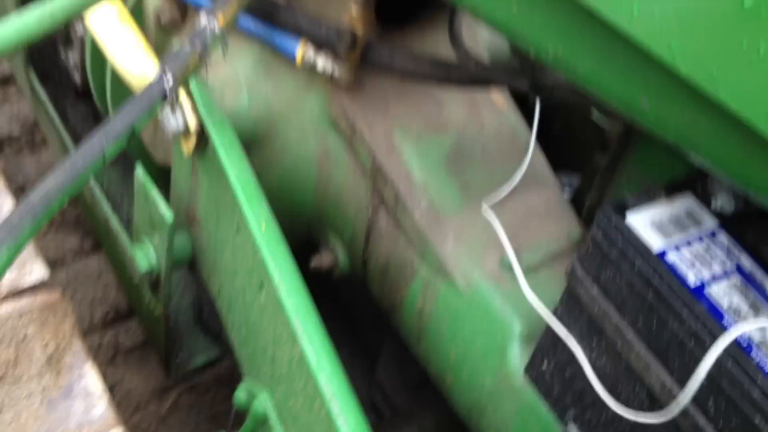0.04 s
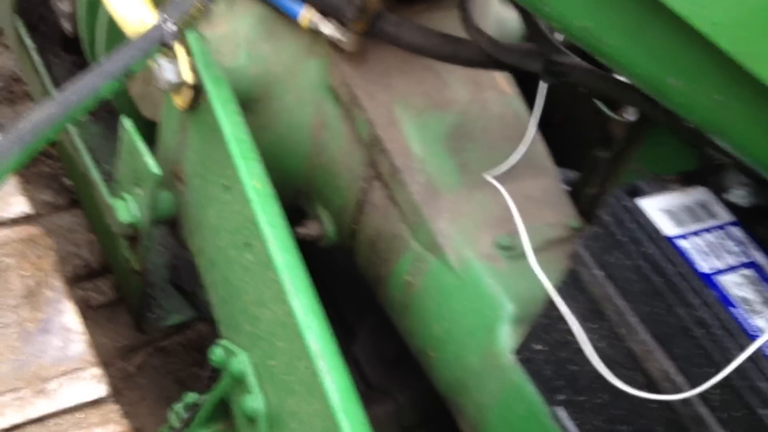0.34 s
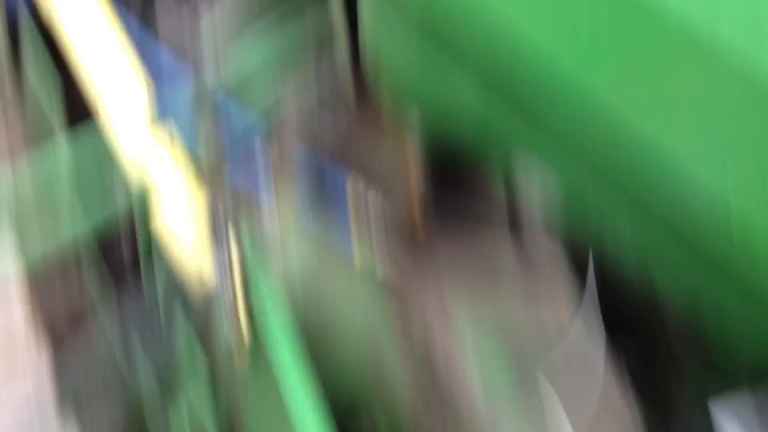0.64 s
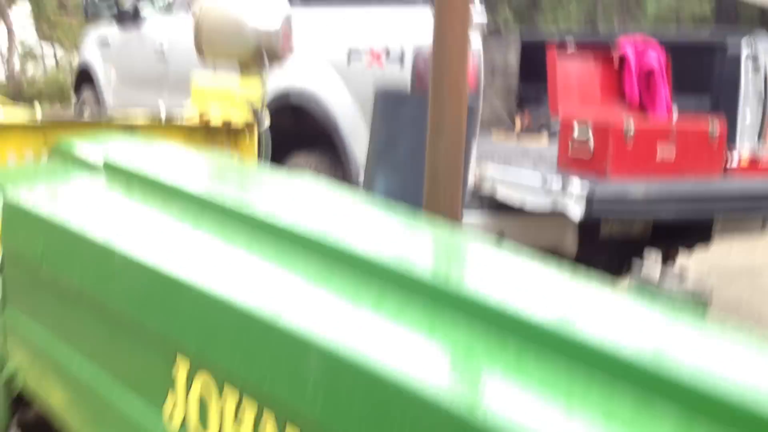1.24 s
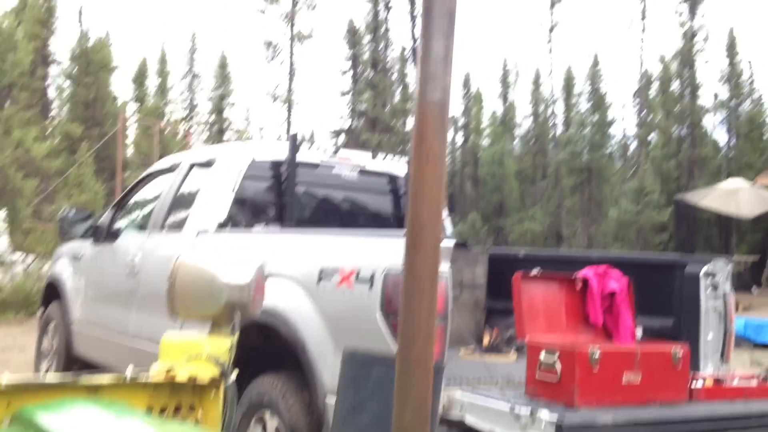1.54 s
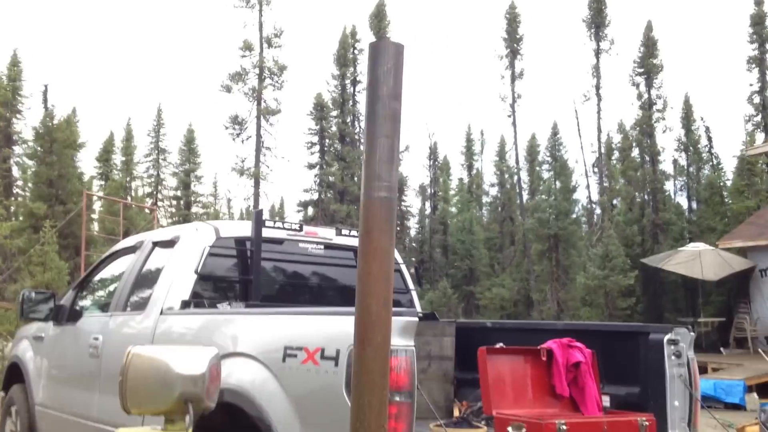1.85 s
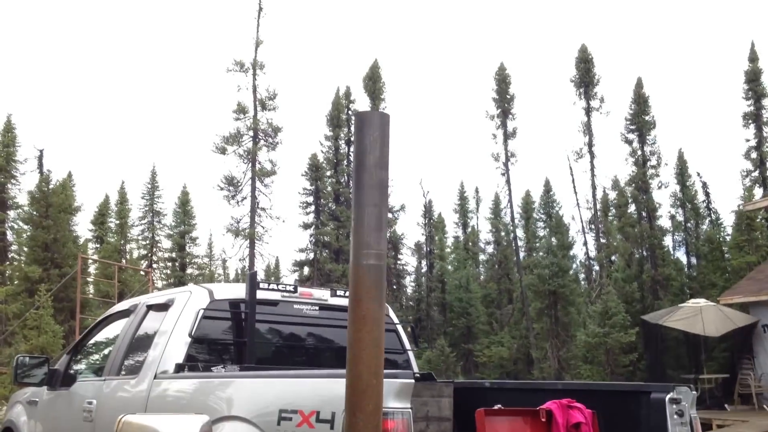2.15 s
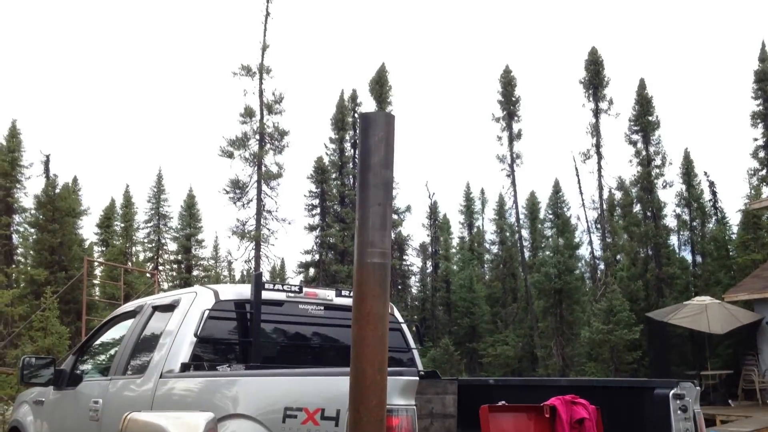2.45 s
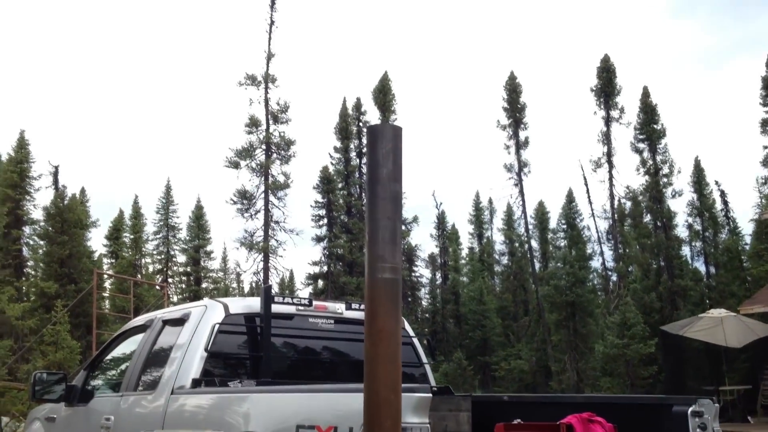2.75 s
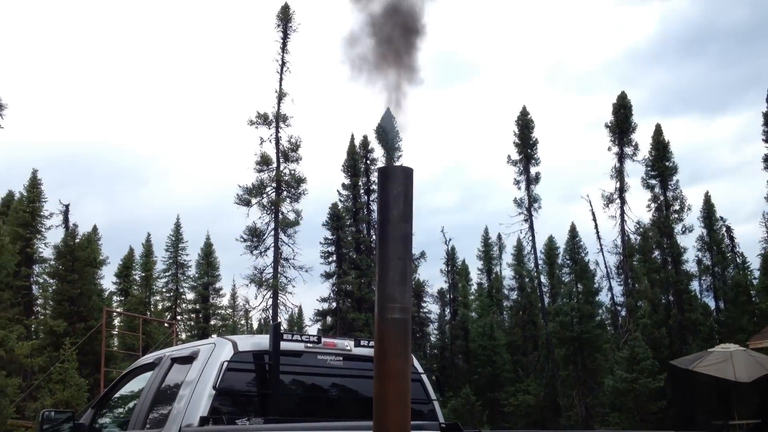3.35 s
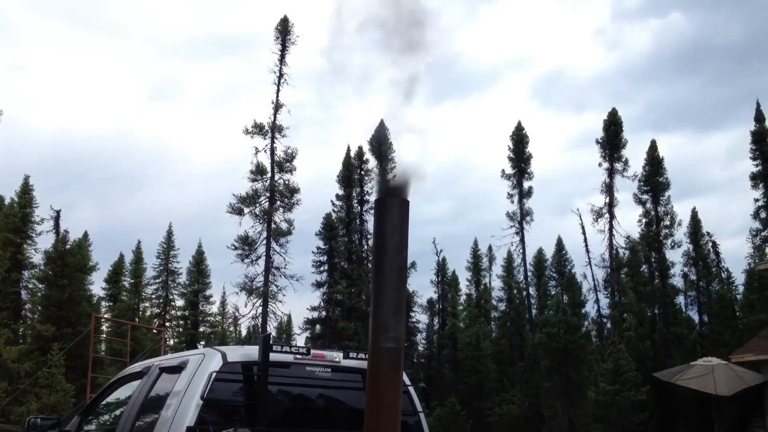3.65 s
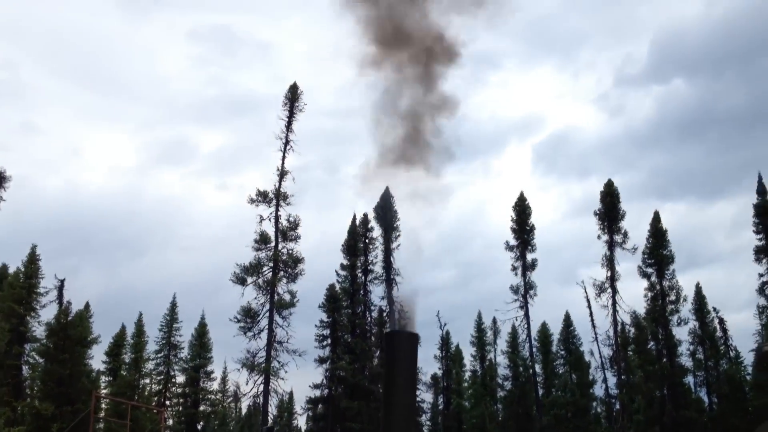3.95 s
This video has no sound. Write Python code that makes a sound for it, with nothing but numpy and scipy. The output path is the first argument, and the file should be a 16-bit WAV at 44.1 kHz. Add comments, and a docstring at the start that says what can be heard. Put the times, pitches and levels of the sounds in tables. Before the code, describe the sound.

A diesel tractor starts outdoors. After a quiet moment with dull bumps and rubbing on the hand-held microphone, the starter clanks in and whines, then the engine catches and runs with quickening knocks and clatter.

```python
"""Diesel tractor start

Outdoors, a hand-held camera is swung round with soft bumps and rubbing.
The starter pinion clanks in and whines against the ring gear.
The engine catches: combustion knocks, with brighter clacks between them, come ever faster
over gear clatter and exhaust. The yard adds a short echo."""
import sys
import numpy as np
from scipy import signal
from scipy.fft import rfft, irfft
from scipy.io import wavfile
from scipy.ndimage import uniform_filter1d

SR = 44100
rng = np.random.default_rng(int(sys.argv[2]) if len(sys.argv) > 2 else 0)


def pcm_store(signal):
    """Save signal as 16-bit PCM."""
    levels = np.round(np.clip(np.atleast_2d(signal), -1, 1) * 32767)
    wavfile.write(sys.argv[1], SR, levels.astype(np.int16).T)


N = 176400
T = np.arange(N) / SR

# combustion knocks: t/s, level/dB, length/s, strongest f/Hz
FIRINGS = [(2.829, -23, 0.019, 1470), (2.984, -21, 0.02, 1466), (3.021, -22.5, 0.005, 1810),
           (3.118, -22.5, 0.039, 2150), (3.174, -23.5, 0.012, 1860), (3.234, -17.5, 0.011, 1156),
           (3.332, -16, 0.02, 1890), (3.429, -19.5, 0.008, 1590), (3.515, -15.5, 0.0079, 1220),
           (3.598, -21.5, 0.011, 1710), (3.674, -23, 0.017, 1550), (3.751, -13, 0.0057, 1646),
           (3.819, -17.5, 0.0098, 1690), (3.886, -20, 0.0093, 1680), (3.95, -14, 0.0072, 1575)]
# mechanical clacks: t/s, body/dB, sizzle/dB
CLACK_HITS = [(2.822, -24, -27.5), (3.071, -13.5, -27), (3.194, -11.5, -24), (3.394, -15.5, -26.5),
              (3.482, -11.5, -28.5), (3.564, -20, -31.5), (3.646, -16.5, -28.5), (3.72, -10.5, -26),
              (3.794, -28, -29.5), (3.859, -17.5, -31.5), (3.925, -12, -24), (3.987, -16.5, -30)]
# running noise: t/s, exhaust/dB, gear clatter/dB, tooth rasp/dB, hiss/dB
RUN_LEVELS = [(2.348, -73, -44, -69, -70), (2.41, -31.5, -24, -33.5, -43.5), (2.5, -33, -30, -42, -53.5),
              (2.6, -28.5, -31.5, -43.5, -50.5), (2.68, -33, -26, -30.5, -49),
              (2.81, -32, -27, -35.5, -47.5), (2.87, -29, -26.5, -25.5, -38.5),
              (3.04, -34.5, -27, -32, -40), (3.11, -29, -22, -22.5, -37), (3.39, -24.5, -19, -27.5, -34.5),
              (3.55, -28.5, -25, -33, -47), (3.7, -28.5, -26.5, -38.5, -46), (3.78, -26.5, -21.5, -28, -38),
              (3.9, -31, -24, -35, -47.5)]
# heavy exhaust puffs: t/s, level/dB
PUFFS = [(2.886, -19.5), (3.286, -20)]
# stack, block and hood resonances: f/Hz, width/Hz, lift/dB
BODY_MODES = [(281, 18, 8), (1210, 21, 0.5), (1740, 20, 1), (2177, 180, 2), (3640, 214, 7), (4060, 520, 8)]
# pinion strikes: t/s, clank/dB, scrape/dB, thud/dB, length/s
PINION_HITS = [(2.354, -20.5, -29.5, -37, 0.015), (2.368, -19.5, -42, -27, 0.012),
               (2.384, -13, -41, -29, 0.014)]
# starter gear mesh: t/s, f/Hz, level/dB, overtones/dB
MESH_TRACK = [(2.49, 635, -42, -50), (2.54, 668, -34, -44), (2.62, 640, -42, -43), (2.7, 755, -36, -36),
              (2.74, 812, -32, -35), (2.79, 822, -30.5, -34), (2.84, 805, -43, -36), (2.92, 895, -44, -28),
              (3.01, 820, -38, -30), (3.1, 850, -42, -29), (3.4, 740, -52, -40)]
# starter overtones: multiple of a third of the mesh pitch, level/dB
OVERTONES = [(4, -6), (5, -5), (7, -3.5), (8, 0), (9, -7)]
# ring gear modes: f/Hz, level/dB
GEAR_MODES = [(668, -37), (1910, -34.5), (2150, -43), (3230, -40.5), (3950, -42.5)]
# camera bumps: t/s, level/dB, half length/s
BUMP_HITS = [(1.003, -41, 0.019), (1.052, -33.5, 0.0056), (1.349, -31.5, 0.006), (1.385, -17, 0.0081),
             (1.504, -24.5, 0.015), (1.534, -20, 0.0052), (1.6, -27, 0.0053), (1.725, -20, 0.0061),
             (1.741, -21.5, 0.0058), (1.872, -19.5, 0.0063), (1.93, -28.5, 0.005), (1.97, -31, 0.0045),
             (2.132, -28.5, 0.0035)]
# hand rubbing the case: t/s, level/dB
RUB_LEVELS = [(.68, -76), (.8, -59), (1.02, -48.5), (1.2, -57), (1.42, -36.5), (2.05, -49.5), (2.33, -41),
              (2.45, -46)]
# small handling ticks, then the midrange knock of the loudest bump: t/s, level/dB, f/Hz
HANDLING_TAPS = [(.565, -57, 3850), (.675, -57.5, 2100), (1.315, -52.5, 850), (1.382, -35, 440)]
# noise floor: t/s, outdoor air/dB, separate high hiss/dB
FLOOR_LEVELS = [(0, -64, -68.5), (.25, -68, -69.5), (.88, -62, -65), (.91, -65.5, -75.5),
                (1.4, -63.5, -73.5), (2, -69.5, -76)]
# source spectra: f/Hz, relative level/dB
KNOCK_SPECTRUM = [(100, -63), (350, -5), (1200, 4.5), (2100, 6), (2700, -6.5), (4000, -14.5), (4600, -21),
                  (8000, -14), (10000, -21.5), (15500, -25)]
CLACK_SPECTRUM = [(100, -15), (400, -7), (1000, 9), (2000, 9.5), (2800, 3.5), (4000, -7.5), (5000, -23.5)]
EXHAUST_SPECTRUM = [(25, -40), (100, -42.5), (180, -1.5), (290, 2.5), (350, -4.5), (600, -3), (3000, -42)]
CLATTER_SPECTRUM = [(130, -52), (580, -5.5), (850, 1), (1250, 7), (2150, 2.5), (2700, -30), (4500, -47.5),
                    (15000, -45)]
RASP_SPECTRUM = [(1000, -21.5), (2300, 16.5), (4000, 2), (4500, -16), (15000, -73)]
HISS_SPECTRUM = [(2000, -39), (4800, -2), (8200, 4), (9400, -6.5), (12500, -5.5), (15500, -28)]
THUD_SPECTRUM = [(60, -36), (150, -12), (245, 2), (600, -12), (2000, -57)]
BUMP_SPECTRUM = [(40, -43), (150, 3), (300, 10), (600, -19), (1400, -57)]
RUB_SPECTRUM = [(25, -43.5), (70, -9.5), (160, 6), (330, -12.5), (1200, -50), (4000, -65)]
AIR_SPECTRUM = [(25, -19), (150, 9), (1800, 7), (2900, -2.5), (3800, 1), (4800, -4.5), (15000, -17)]


def amp(db):
    """Decibels to gain."""
    return 10 ** (np.asarray(db) / 20)


def unit(x):
    """Scale to rms 1."""
    return x / np.sqrt(np.mean(x ** 2) + 1e-20)


def curve(rows, column=1):
    """Table column, linearly interpolated in time."""
    rows = np.array(rows)
    return np.interp(T, rows[:, 0], rows[:, column])


def drift(samples):
    """Moving average of noise, rms 1."""
    return unit(uniform_filter1d(rng.standard_normal(N), samples))


def grit(spread_db=2):
    """Noise of uneven strength: dense small impacts."""
    return unit(rng.standard_normal(N) * amp(spread_db * drift(samples=24)))


def burst(start_s, length_s, rise_s, fall_s):
    """Envelope of a blow: attack, hold, exponential release."""
    attack = np.clip((T - start_s) / rise_s, 0, 1)
    return attack * np.exp(-np.maximum(T - start_s - length_s, 0) / fall_s)


def swell(at_s, db, hz, half_s):
    """Tone under a Gaussian envelope, random phase."""
    envelope = amp(db) * np.exp(-((T - at_s) / half_s) ** 2)
    return envelope * np.sin(2 * np.pi * (hz * (T - at_s) + rng.random()))


def colour(x, spectrum, modes=(), size=8192):
    """Minimum-phase filter of unit energy from a spectrum and resonances."""
    hz = np.fft.rfftfreq(size, 1 / SR)
    point_hz, point_db = np.transpose(spectrum)
    db = np.interp(np.log(hz + 1), np.log(point_hz), point_db)
    db += sum(lift / (1 + (2 * (hz - centre) / width) ** 2) for centre, width, lift in modes)
    cepstrum = irfft(np.log(amp(db)))
    cepstrum[1:size // 2] *= 2
    cepstrum[size // 2 + 1:] = 0
    impulse = irfft(np.exp(rfft(cepstrum)))[:size // 2]
    return signal.oaconvolve(x, impulse / np.linalg.norm(impulse))[:N]


def resonate(x, hz, width_hz):
    """Steady or moving resonance; keeps the power of white noise."""
    carrier = np.exp(2j * np.pi * np.cumsum(hz * np.ones(len(x))) / SR)
    pole = np.exp(-np.pi * abs(width_hz) / SR)
    baseband = signal.lfilter([np.sqrt(1 - pole * pole)], [1, -pole], x / carrier + 1e-18)
    return np.sqrt(2) * (carrier * baseband).real


def band(x, hz, width_hz, widen=1):
    """Two resonances in series, the second `widen` times as wide."""
    return resonate(resonate(x, hz, width_hz), hz, widen * width_hz)


def knocks(crack_gain=.37, crack_s=.0063, ring_gain=.25):
    """Each firing hits the block hardest at first, then rattles on, favouring one pitch."""
    rattle, drive = grit(), np.zeros(N)
    for start_s, db, length_s, hz in FIRINGS:
        crack = 1 + crack_gain * np.exp(-np.maximum(T - start_s, 0) / crack_s)
        blow = amp(db) * crack * burst(start_s, length_s, rise_s=.003, fall_s=.013) * rattle
        drive += blow + ring_gain * resonate(blow, hz, width_hz=110)
    return colour(drive, KNOCK_SPECTRUM, BODY_MODES)


def clacks():
    """Short rattles between firings, each with its own share of sizzle."""
    body = sizzle = 0
    for start_s, body_db, sizzle_db in CLACK_HITS:
        envelope = burst(start_s, length_s=.0074, rise_s=.0055, fall_s=.0086)
        body += amp(body_db) * envelope
        sizzle += amp(sizzle_db) * envelope
    return colour(body * grit(), CLACK_SPECTRUM, BODY_MODES) + colour(sizzle * grit(), HISS_SPECTRUM)


def exhaust_and_gears(tooth_hz=122.7, jitter=.19, depth=.11):
    """Exhaust booms in the stack; the gear train chatters tooth by tooth."""
    cycles = np.cumsum(tooth_hz * (1 + jitter * drift(samples=800))) / SR
    teeth = unit(1 + depth * (1 - 2 * (cycles % 1)))
    drive = (T > RUN_LEVELS[0][0]) * teeth
    spectra = EXHAUST_SPECTRUM, CLATTER_SPECTRUM, RASP_SPECTRUM, HISS_SPECTRUM
    return sum(colour(amp(curve(RUN_LEVELS, column)) * drive * grit(), spectrum, BODY_MODES)
               for column, spectrum in enumerate(spectra, 1))


def stack():
    """The first heavy puffs sound the exhaust pipe."""
    return sum(swell(at_s, db, hz=300.6, half_s=.016) for at_s, db in PUFFS)


def loose_parts(rate_per_s=1400, low_hz=2360, high_hz=13330, fall_s=.0075, re_hiss_db=-2, size=2048):
    """Small parts shaken by the engine ring briefly, each at its own pitch."""
    tinks, t = np.zeros(N + size), T[:size]
    chance, pitch, strength = rng.random((3, N))
    for i in np.flatnonzero(chance < rate_per_s / SR):
        hz = low_hz + (high_hz - low_hz) * pitch[i]
        tinks[i:i + size] += strength[i] ** 2 * np.exp(-t / fall_s) * np.sin(2 * np.pi * hz * t)
    level = (T > RUN_LEVELS[0][0]) * amp(curve(RUN_LEVELS, 4) + re_hiss_db)
    return level * unit(colour(tinks[:N], HISS_SPECTRUM))


def pinion(rise_s=.0075):
    """Teeth scrape, then bite with a clank and a thud through the frame."""
    clank = scrape = thud = 0
    for start_s, clank_db, scrape_db, thud_db, length_s in PINION_HITS:
        clank += amp(clank_db) * burst(start_s, length_s, rise_s, fall_s=.0076)
        scrape += amp(scrape_db) * burst(start_s, length_s, rise_s, fall_s=.017)
        thud += amp(thud_db) * burst(start_s, length_s, rise_s, fall_s=.074)
    return (colour(clank * grit(), KNOCK_SPECTRUM, BODY_MODES)
            + colour(scrape * grit(), HISS_SPECTRUM)
            + colour(thud * grit(), THUD_SPECTRUM))


def whine(hz, roughness=.34):
    """One rough gear partial: sine plus narrow-band noise."""
    fuzz = unit(band(rng.standard_normal(N), hz, width_hz=36, widen=2))
    tone = unit(np.sin(2 * np.pi * np.cumsum(hz) / SR))
    return unit((1 - roughness) * tone + roughness * fuzz)


def starter(wobble=.006):
    """Gear whine climbs with engine speed and sags on compression; a steel part pings once."""
    mesh_hz = curve(MESH_TRACK) * (1 + wobble * drift(samples=400))
    overtones = sum(amp(db) * whine(multiple * mesh_hz / 3) for multiple, db in OVERTONES)
    overtones *= amp(curve(MESH_TRACK, 3))
    mesh = amp(curve(MESH_TRACK, 2)) * whine(mesh_hz)
    turning = (T > MESH_TRACK[0][0]) & (T < MESH_TRACK[-1][0])
    ping = swell(at_s=2.598, db=-19, hz=1440, half_s=.011)
    return turning * (mesh + overtones) + ping


def ring_gear():
    """Pinion teeth excite the ring gear's modes while cranking."""
    teeth = burst(start_s=2.52, length_s=.42, rise_s=.21, fall_s=.21) * grit()
    return sum(amp(db) * resonate(teeth, hz, width_hz=16) for hz, db in GEAR_MODES)


def handling(bump_hz=170, scuff_db=-13, tap_width_ratio=.6, pressure_db=5):
    """Dull camera bumps, the loudest with a midrange knock; small ticks; uneven hand rubbing."""
    bumps = sum(swell(at_s, db, bump_hz, half_s) for at_s, db, half_s in BUMP_HITS)
    taps = 0
    for start_s, db, hz in HANDLING_TAPS:
        ring = unit(band(rng.standard_normal(N), hz, tap_width_ratio * hz))
        taps += amp(db) * ring * burst(start_s, length_s=.002, rise_s=.001, fall_s=.006)
    contact = sum(amp(db + scuff_db) * np.exp(-((T - at_s) / half_s) ** 2)
                  for at_s, db, half_s in BUMP_HITS)
    scuff = colour(contact * rng.standard_normal(N), BUMP_SPECTRUM)
    pressure = unit(amp(pressure_db * np.tanh(drift(samples=1500))))
    rub = colour(amp(curve(RUB_LEVELS)) * pressure * grit(), RUB_SPECTRUM)
    return bumps + taps + scuff + rub


def high_hiss(bands_hz=(7750, 12300)):
    """Thin hiss in two high bands; drops away at 0.9 s."""
    return amp(curve(FLOOR_LEVELS, 2)) * unit(sum(band(grit(), hz, width_hz=2700) for hz in bands_hz))


def air():
    """Faint outdoor background."""
    return amp(curve(FLOOR_LEVELS)) * colour(rng.standard_normal(N), AIR_SPECTRUM)


def yard(x, echo_db=-12.5, t60_s=.18, gap_s=.004, density=.05, size=16000):
    """Add sparse short reflections from the ground and nearby vehicles."""
    taps = rng.standard_normal(size) * (rng.random(size) < density)
    taps *= amp(-60 * T[:size] / t60_s) * (T[:size] > gap_s)
    return x + amp(echo_db) * signal.oaconvolve(x, taps / np.linalg.norm(taps))[:N]


def scene():
    """Tractor in its yard, handling noise, hiss and air; mono."""
    cranking = pinion() + starter() + ring_gear()
    engine = knocks() + clacks() + exhaust_and_gears() + loose_parts() + stack()
    return (yard(cranking + engine) + handling() + high_hiss() + air())[None]


def record(dry, low_cut_hz=57, ceiling=.8, edge_hz=15600):
    """Microphone: bass cut, soft overload on peaks, band limit."""
    thin = signal.sosfilt(signal.butter(2, low_cut_hz, "high", fs=SR, output="sos"), dry)
    limited = thin / (1 + (thin / ceiling) ** 4) ** .25
    lowpass = signal.firwin(511, edge_hz, window=("kaiser", 9), fs=SR)
    return signal.oaconvolve(limited, lowpass[None], "same")


dry = scene()
out = record(dry)
pcm_store(out)
```